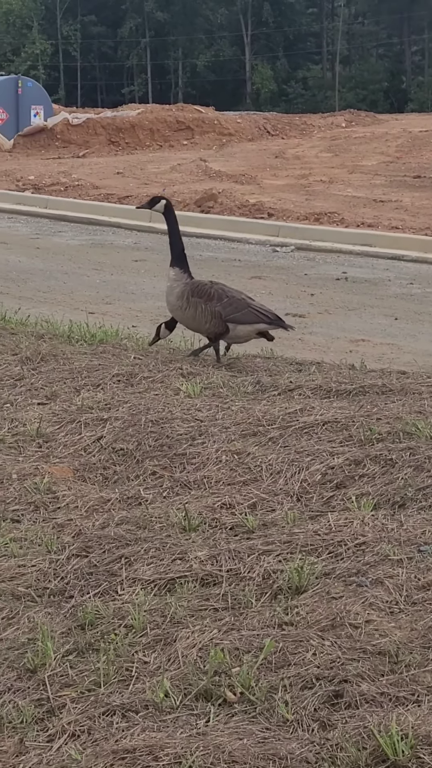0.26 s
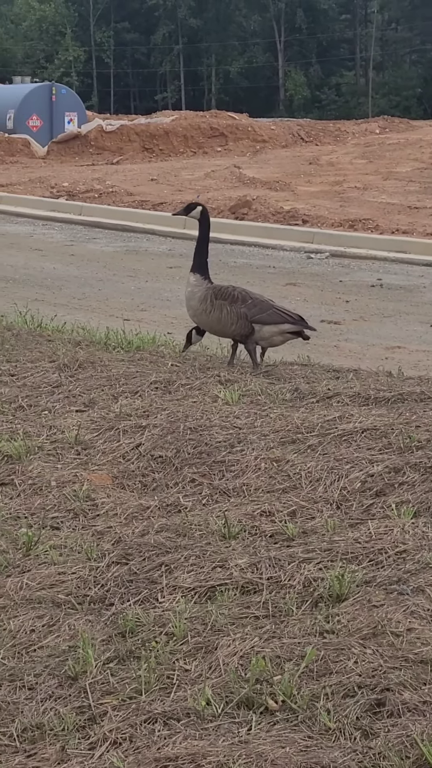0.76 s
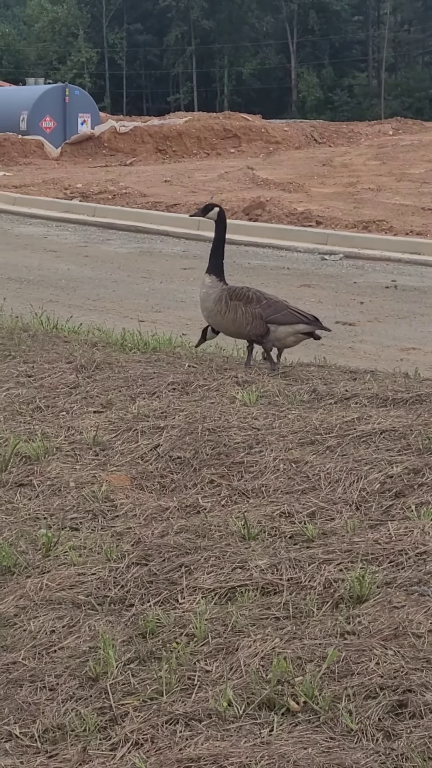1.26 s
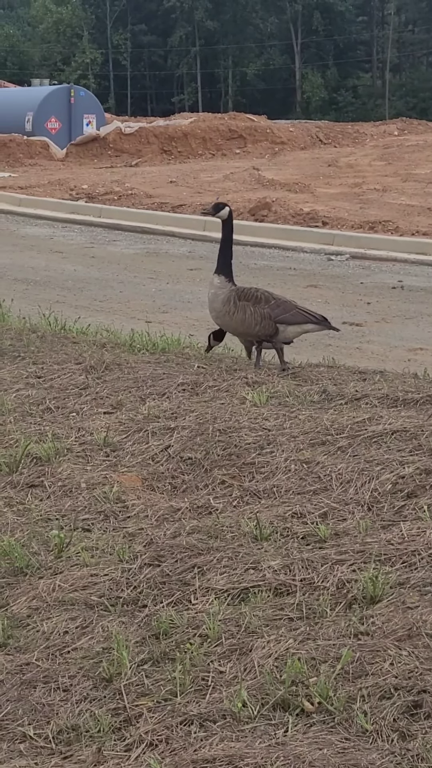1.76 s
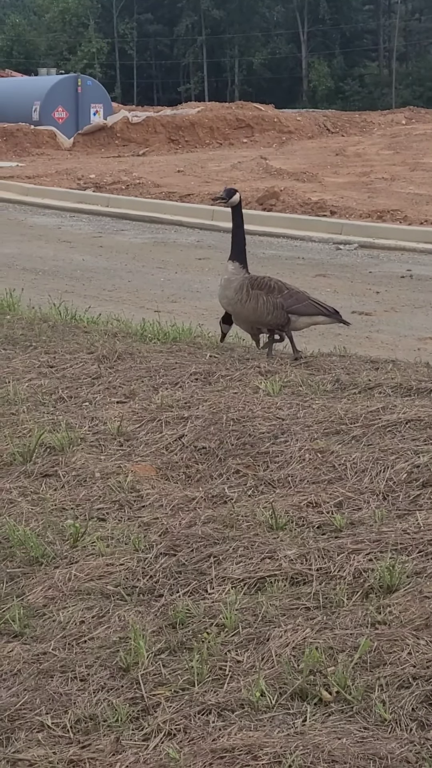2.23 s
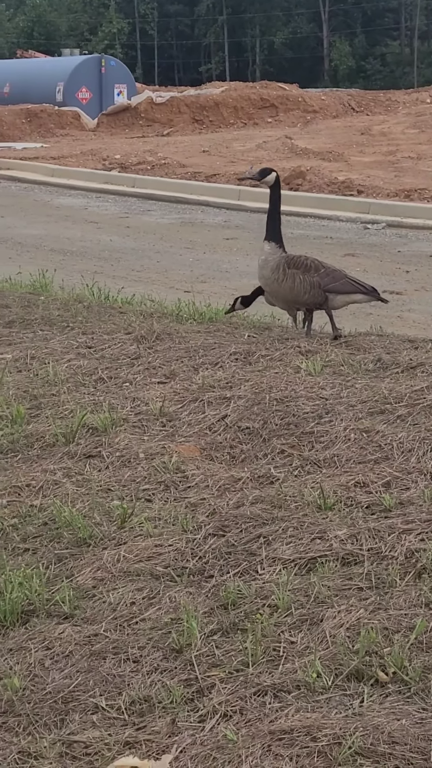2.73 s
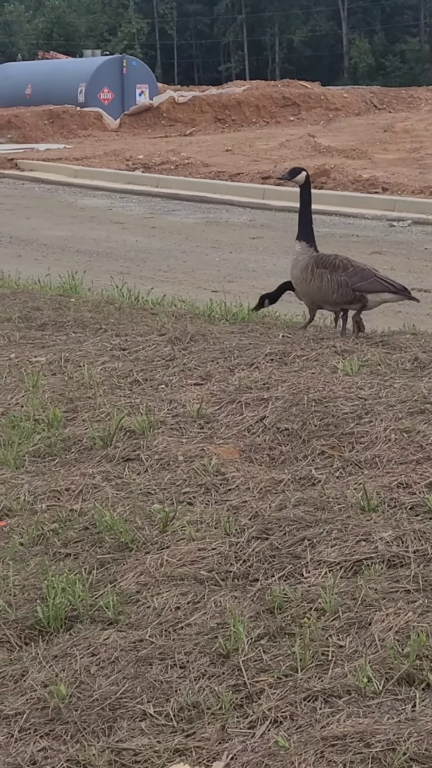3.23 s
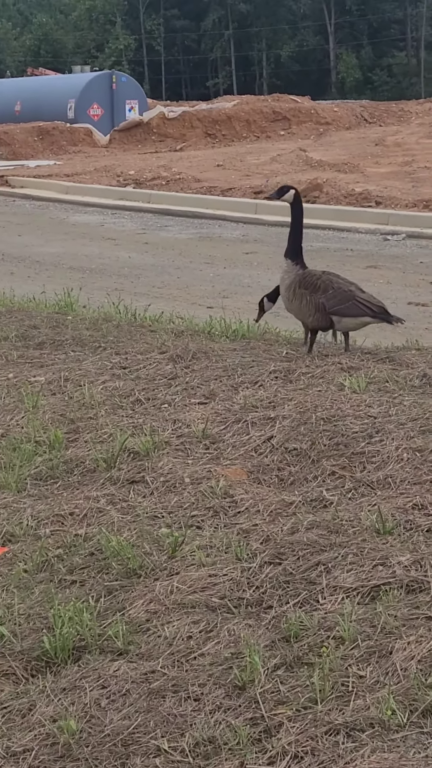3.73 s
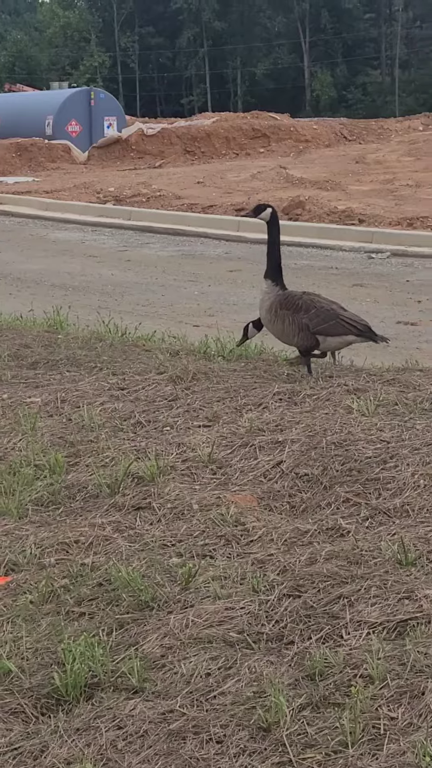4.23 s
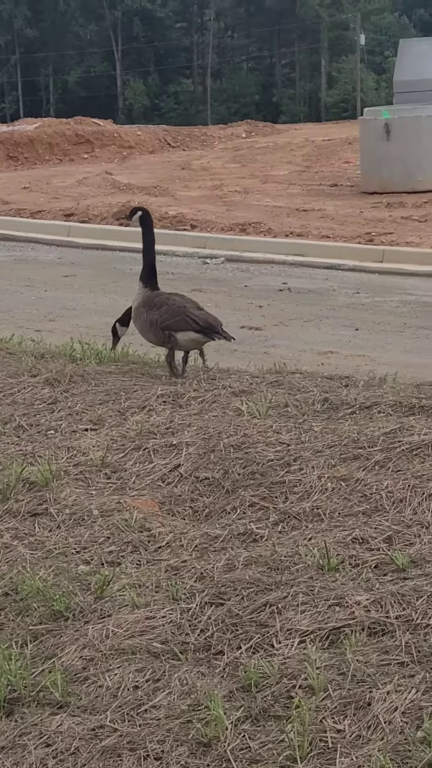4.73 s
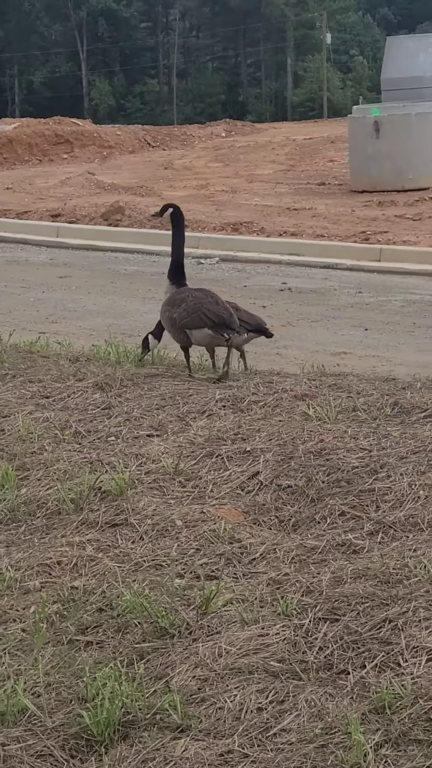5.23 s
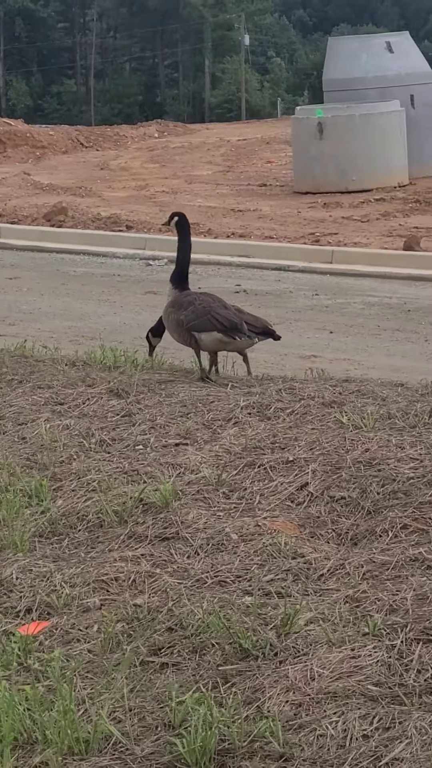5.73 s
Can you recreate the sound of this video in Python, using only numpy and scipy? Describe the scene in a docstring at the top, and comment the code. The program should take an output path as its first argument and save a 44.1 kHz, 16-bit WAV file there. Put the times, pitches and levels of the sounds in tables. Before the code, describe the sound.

A goose gives one short, raspy honk nearby over a steady low rumble of distant traffic, then dry grass crackles faintly.

```python
"""Distant traffic rumbles and engines drone, heard from dry grass beside a building site.
Faint slurred whistles come and go in a thin hiss. Near the microphone a goose gives one short honk:
its flapping membrane makes a rattling growl that swells and breaks into a clear note.
Dry straw then crackles underfoot. Throughout, a hand half covers the right microphone port,
muffling it, rubbing it and bumping it now and then."""
import sys
import numpy as np
from scipy import signal
from scipy.fft import rfft, irfft
from scipy.io import wavfile
from scipy.ndimage import uniform_filter1d

SR = 44100
rng = np.random.default_rng(int(sys.argv[2]) if len(sys.argv) > 2 else 0)


def wav_out(sig):
    """Save sig, one row per channel (or a flat mono array), as 16-bit PCM at SR to the path in sys.argv[1]."""
    wavfile.write(sys.argv[1], SR, np.round(np.clip(np.atleast_2d(sig).T, -1, 1) * 32767).astype(np.int16))


N = 264159
TIME = np.arange(N) / SR
BINS = np.fft.rfftfreq(N, 1 / SR)
# the honk: the growl starts, breaks into the note, and is released
GROWL_S, BREAK_S, RELEASE_S = 2.228, 2.3845, 2.438
CHAOS_S = .013  # the flapping is most chaotic this long before the break

# likeness of diffuse sound at the two ports: (frequency [Hz], correlation [0-1])
PORT_LIKENESS = [(25, 0), (60, 0.004), (130, 1), (290, 0.67), (640, 1), (1400, 0.38), (3000, 0), (15000, 0)]
# low rumble of distant traffic: (frequency [Hz], relative level [dB])
RUMBLE_SPECTRUM = [(11, -49), (18, -10), (49, 2), (129, 0.5), (206, -5.5), (239, -8.5), (270, -10),
                   (450, -22.5), (580, -70), (990, -120)]
# roar of far tyres: (frequency [Hz], relative level [dB])
TYRE_SPECTRUM = [(240, -10.5), (400, -19), (480, -6), (643, 0.5), (800, -3), (1170, -7.5), (1850, -20.5),
                 (3160, -28.5), (4040, -40), (5410, -34.5), (6400, -50.5), (7600, -44.5), (8400, -48.5),
                 (9400, -39), (11200, -49), (15600, -51)]
# far engines: (starting pitch [Hz], glide [Hz/s], base level [dB], swells),
# each swell (time [s], half-width [s], height [dB])
ENGINE_DRONES = [(231, 2.5, -40, [(2.0, 0.83, 8.5), (3.4, 0.34, 5), (5.6, 0.67, 3.5)]),
                 (101.2, 0.27, -39.5, [(2.0, 0.46, 5.5), (3.45, .25, 6), (4.75, .3, 6)]),
                 (125.3, 1.0, -45, [(3.3, 0.46, 16), (4.65, 0.62, 16.5), (5.9, .25, 15.5)]),
                 (78.8, -0.9, -41.5, [(0.72, .45, 8.5)])]
# thin background hiss: (frequency [Hz], relative level [dB])
HISS_SPECTRUM = [(1500, -4), (2500, -8), (3600, 0.5), (4100, -3), (4900, -3), (5600, -6), (6300, -28),
                 (7500, -17), (8500, -26), (15000, -24)]
# faint rings in the hiss: (frequency [Hz], width [Hz], level against the hiss [dB])
HISS_RESONANCES = [(3576, 81, -10), (4935, 210, -13.5), (5520, 150, -15)]
# swells and dips of the hiss: (time [s], half-width [s], change [dB])
HISS_CHANGES = [(.6, 0.23, 3.5), (3.536, 0.2, -7), (5.85, 0.17, -5)]
# faint whistles: (start [s], length [s], first pitch [Hz], last pitch [Hz], width [Hz], level [dB])
WHISTLE_GLIDES = [(.44, .16, 5500, 4850, 450, -70), (.69, .12, 5680, 5150, 200, -68),
                  (0.888, .13, 3040, 3130, 55, -61), (1.0, .13, 3000, 3620, 55, -59.5),
                  (1.09, .09, 4600, 4800, 450, -59), (1.15, .21, 3300, 3130, 55, -60.5),
                  (1.34, .11, 3190, 3370, 70, -62.5), (1.508, .12, 2970, 3320, 90, -62),
                  (3.788, 0.12, 4560, 5750, 350, -60), (3.89, .09, 4800, 4970, 400, -57),
                  (3.91, .045, 11300, 11700, 400, -63), (3.95, 0.098, 10800, 9900, 900, -67),
                  (4.0, .14, 6060, 5750, 200, -66), (4.09, .22, 9900, 9450, 900, -68),
                  (4.26, 0.11, 5860, 5450, 250, -62.5), (4.34, 0.088, 5450, 4300, 400, -57),
                  (4.395, 0.081, 4400, 5700, 400, -58.5), (4.452, .08, 9600, 10000, 700, -67),
                  (4.48, .11, 5930, 5550, 250, -63.5)]
# crushed dry straw: (frequency [Hz], relative level [dB])
STRAW_SPECTRUM = [(500, -32), (1000, -3), (1600, -4), (3060, -3.5), (4000, -9.5), (5200, -6), (6100, -16),
                  (7700, -17.5), (8500, -17), (12000, -20), (15600, -19)]
# steps on the straw: (start [s], length [s], relative level [dB], treble cutoff [Hz])
FOOTSTEPS = [(2.45, 1, -53, 8000), (3.627, 0.078, -48, 11000), (3.773, 0.015, -41.5, 11500),
             (3.75, 0.26, -56, 14000), (3.857, 0.16, -50.5, 8000), (4.137, 0.049, -50, 8000),
             (4.568, 0.19, -42.5, 3680), (5.268, 0.18, -39, 13900), (5.391, 0.049, -40, 6000),
             (5.53, 0.41, -56.5, 14000), (5.933, 0.16, -44.5, 7000)]
# single stalks snapping: (time [s], relative peak [dB], ring [Hz])
STALK_SNAPS = [(2.6226, -32, 2520), (2.849, -38, 2600), (3.716, -36, 3400), (3.7957, -38, 3280),
               (3.8625, -34.5, 3800), (3.892, -38, 2320), (4.0063, -40, 3401), (5.2943, -37.5, 2620),
               (5.318, -35, 3210), (5.326, -41, 3130), (5.494, -33, 3200)]
# dulling of snaps and crackle: (frequency [Hz], gain [dB])
STALK_DULLING = [(1000, 0.5), (4500, -1.5), (6500, -12), (15000, -12)]
# muffling of the right port under the hand: (frequency [Hz], loss [dB])
PORT_LOSS = [(25, 34), (60, 12.4), (130, 18.2), (250, 18.4), (420, 18.7), (600, 29), (1170, 13.8),
             (1800, 19.7), (4200, 23.2), (6400, 40), (8100, 24), (8500, 31), (9300, 1), (10600, 28),
             (15000, 3.8)]
# the hand sliding over that port: (time [s], half-width [s], level [dB])
HAND_RUBS = [(0.8, 0.45, -45), (3.7, 0.25, -40), (5.25, 0.11, -33.5)]
# the hand bumping that port: (time [s], level [dB], pitch [Hz], case knock against the push [dB])
HAND_BUMPS = [(0.414, -27.5, 71, -30), (0.6, -25, 75, -35), (0.782, -36, 80, -28), (0.913, -28, 80, -28),
              (1.05, -26, 45, -35), (1.133, -27, 70.6, -28), (2.115, -28, 100, -30), (2.145, -28, 65, -35),
              (3.487, -28, 150, -9), (3.56, -23, 70, -17), (3.605, -24, 60.3, -30), (3.79, -24, 79, -28),
              (3.84, -18, 65, -32), (4.014, -25, 90, -24), (4.046, -28, 45, -35), (4.124, -16, 62, -32),
              (5.125, -27, 95, -20), (5.25, -14.5, 100, -11), (5.279, -16.5, 84.6, -16),
              (5.338, -28, 90, -18), (5.367, -22, 111, -17)]
# decay of the outdoor scatter: (frequency [Hz], time to fall 60 dB [s])
SCATTER_DECAY = [(300, .5), (1200, 0.46), (4000, 0.39), (12000, 0.17)]
# the goose's throat resonances: (frequency [Hz], width [Hz], relative gain [dB])
THROAT_RESONANCES = [(498, 130, -7.5), (1107, 114, 0), (1300, 66, -0.5), (1356, 114, -0.5), (1537, 95, -11),
                     (1950, 98, -18), (3400, 700, -40)]
# harmonics of its clear note: (multiple of the pitch, relative level [dB])
NOTE_PARTIALS = [(1, -11), (2, 4.5), (3, -21.5), (4, -41), (5, -48), (6, -38)]
# rasp of air at each flap: (frequency [Hz], relative gain [dB])
RASP_SPECTRUM = [(300, -34), (1500, 12.5), (2000, -10), (2500, -6), (2950, -8), (3380, 8.5), (3800, 1),
                 (4200, -10), (4900, -2), (6500, -9), (7150, -18), (8000, -18), (10500, -11), (11500, -21),
                 (15500, -31)]


def gain_of(db):
    """Decibels to amplitude."""
    return 10 ** (np.asarray(db) / 20)


def unit_rms(x):
    """Scales to an rms of one."""
    return x / np.sqrt(np.mean(x ** 2) + 1e-20)


def lookup(table, hz):
    """Reads a table on a log-frequency axis."""
    table_hz, values = np.transpose(table)
    return np.interp(np.log(hz + 1), np.log(table_hz + 1), values)


def colour(x, spectrum):
    """Filters by a spectrum table."""
    return irfft(rfft(x) * gain_of(lookup(spectrum, BINS)), N)


def drift(rate_hz, size=8192):
    """Slow random wander of rms one."""
    t = np.linspace(0, N / SR, size)
    rolloff = 1 + (np.fft.rfftfreq(size, t[1]) / rate_hz) ** 4
    slow = irfft(rfft(rng.standard_normal(size)) / rolloff, size)
    return np.interp(TIME, t, unit_rms(slow))


def resonate(x, hz, width_hz):
    """Two like resonances in series, centred on hz, which may glide."""
    carrier = np.exp(2j * np.pi * np.cumsum(hz * np.ones(len(x))) / SR)
    pole = np.exp(-np.pi * width_hz / SR)
    for _ in range(2):
        x = 2 * (carrier * signal.lfilter([1 - pole], [1, -pole], x / carrier + 1e-18)).real
    return x


def add(mix, s, sound):
    """Mixes a sound in at time s."""
    part = mix[round(s * SR):][:len(sound)]
    part += sound[:len(part)]


def since(s):
    """Seconds gone since time s; zero before it."""
    return np.maximum(TIME - s, 0)


def until(s):
    """Seconds left until time s; zero after it."""
    return np.maximum(s - TIME, 0)


def ramp(s, length):
    """Rises from zero to one, starting at time s."""
    return np.minimum(since(s) / length, 1)


def hump(s, half_width):
    """A bell of height one around time s."""
    return np.exp(-((TIME - s) / half_width) ** 2)


def pulses(cycles, count):
    """One sharp pulse a cycle, with about count / 2 harmonics."""
    return unit_rms(np.sinc(count * ((cycles + .5) % 1 - .5)) - 1 / count)


def patchy(x, depth_db):
    """Lets patches of a noise, some 40 ms by 300 Hz, swell and dip on their own."""
    frames = signal.stft(x, nperseg=512)[2]
    patches = uniform_filter1d(rng.standard_normal(frames.shape[-2:]), size=4, axis=0)
    patches = uniform_filter1d(patches, size=7, axis=1)
    return signal.istft(frames * gain_of(depth_db * unit_rms(patches)), nperseg=512)[1][..., :N]


def diffuse(spectrum):
    """Noise from all around the microphone; its treble is unrelated at the two ports."""
    left, unrelated = rfft(rng.standard_normal((2, N)))
    likeness = lookup(PORT_LIKENESS, BINS)
    right = likeness * left + np.sqrt(1 - likeness ** 2) * unrelated
    return unit_rms(irfft(np.array([left, right]) * gain_of(lookup(spectrum, BINS)), N))


def traffic(rumble_db=-25, tyre_db=-36):
    """Distant traffic: a low rumble and the roar of tyres, each swelling a little."""
    rumble = diffuse(RUMBLE_SPECTRUM) * gain_of(rumble_db + .6 * drift(1.5))
    tyres = diffuse(TYRE_SPECTRUM) * gain_of(tyre_db + .45 * drift(1.8))
    return rumble + tyres


def exhaust(top_s=1.6, swell_db=-31.5, rise_db_per_s=6, fall_db_per_s=22, murmur_db=-43):
    """The booming exhaust of a far vehicle builds slowly, then falls away to a murmur."""
    boom = unit_rms(resonate(rng.standard_normal(N), hz=176, width_hz=65))
    swell = gain_of(swell_db - rise_db_per_s * until(top_s) - fall_db_per_s * since(top_s))
    return (swell + gain_of(murmur_db)) * boom


def engine(start_hz, glide, db, swells, waver=.0038, wander_hz=.631, fading_db=.9):
    """A far engine's tone glides and swells, wavering and fading on its way through the air."""
    hz = start_hz + glide * TIME + wander_hz * drift(.78)
    cycles = np.cumsum(hz * (1 + waver * drift(7.6))) / SR
    swell_db = sum(height * hump(s, half_width) for s, half_width, height in swells)
    return gain_of(db + swell_db + fading_db * drift(1.22)) * unit_rms(np.sin(2 * np.pi * cycles))


def hiss(early_db=-69, late_db=-55, opens_s=2.12, flicker_db=1.5):
    """A thin, uneven hiss all around, with faint rings in it; it opens up just before the honk."""
    noise = rng.standard_normal(N)
    rings = sum(gain_of(db) * unit_rms(resonate(noise, hz, width)) for hz, width, db in HISS_RESONANCES)
    bed = patchy(diffuse(HISS_SPECTRUM), depth_db=2.5)
    level_db = early_db + (late_db - early_db) * ramp(opens_s, .057)
    level_db += sum(db * hump(s, half_width) for s, half_width, db in HISS_CHANGES)
    return (bed + rings) * gain_of(level_db + flicker_db * drift(22))


def whistles():
    """Faint, fuzzy whistles in the background, each gliding in pitch as it swells and fades."""
    out = np.zeros(N)
    for s, length, first_hz, last_hz, width, db in WHISTLE_GLIDES:
        progress = np.linspace(0, 1, round(length * SR))
        hz = first_hz + (last_hz - first_hz) * progress
        tone = unit_rms(resonate(rng.standard_normal(len(hz)), hz, width))
        arch = np.sqrt(4 * progress * (1 - progress))
        add(out, s, gain_of(db) * arch * tone)
    return out


def straw_steps(stalks_per_s=11000, spread_db=2.4, attack_share=.16):
    """Each step crushes many small stalks of uneven size underfoot."""
    sizes = gain_of(spread_db * np.minimum(rng.exponential(1, N), 4))
    grains = rng.standard_normal(N) * sizes * (rng.random(N) < stalks_per_s / SR)
    crunch = unit_rms(colour(grains, STRAW_SPECTRUM))
    out = np.zeros(N)
    for s, length, db, cutoff_hz in FOOTSTEPS:
        progress = since(s) / length
        weight = gain_of(db) * np.minimum(progress / attack_share, 1) * np.exp(-2 * progress ** 2)
        out += weight * signal.lfilter(*signal.butter(2, cutoff_hz, fs=SR), crunch)
    return out


def straw_snaps(boost_db=5, crack_s=.0013):
    """A few larger stalks snap on their own, each with a brief ring."""
    out, t = np.zeros(N), np.arange(1024) / SR
    for s, db, hz in STALK_SNAPS:
        crack = rng.standard_normal(len(t)) * t / crack_s * np.exp(-t / crack_s)
        ring = resonate(crack, hz, width_hz=2000)
        add(out, s, gain_of(db + boost_db) * ring / abs(ring).max())
    return colour(out, STALK_DULLING)


def straw_crackle(start_s=2.5, stalks_per_s=60, db=-64.5, clump_db=4, decay_s=.002):
    """Bent stalks on the ground give way in small irregular clumps."""
    clicks = (rng.random(N) < stalks_per_s / SR) * rng.random(N) * gain_of(clump_db * drift(10))
    envelope = signal.lfilter([1], [1, -np.exp(-1 / (decay_s * SR))], clicks)
    bursts = colour(envelope * rng.standard_normal(N), STRAW_SPECTRUM)
    return gain_of(db) * (TIME > start_s) * unit_rms(colour(bursts, STALK_DULLING))


def covered_port(x, lag_s=.00014):
    """Under the hand, the right port picks everything up muffled and a little late."""
    muffled = colour(x, [(hz, -loss_db) for hz, loss_db in PORT_LOSS])
    return np.interp(TIME - lag_s, TIME, muffled)


def wind_and_rubbing(lump_db=3, wind_db=-49):
    """A low, lumpy rumble of wind at the right port never quite stops; the hand sliding on the microphone
    swells it."""
    rumble = resonate(rng.standard_normal(N), hz=45, width_hz=90) * gain_of(lump_db * drift(13))
    slides = sum(gain_of(db) * hump(s, half_width) for s, half_width, db in HAND_RUBS)
    return unit_rms(rumble) * (gain_of(wind_db) + slides)


def hand_bumps(attack_cycles=.14):
    """Each shift of the hand is a dull push of air at the port, with a faint knock of the case."""
    out, t = np.zeros(N), np.arange(4096) / SR
    for s, db, hz, knock_db in HAND_BUMPS:
        cycles = hz * t
        envelope = np.minimum(cycles / attack_cycles, 1) * np.exp(-cycles ** 2 / 2)
        push = envelope * np.sin(2 * np.pi * cycles)
        knock = resonate(rng.standard_normal(len(t)) * np.exp(-cycles), hz=380, width_hz=200)
        add(out, s, gain_of(db) * (push + gain_of(knock_db) * knock / abs(knock).max()))
    return out


def scatter(x, echoes_per_s=2000, first_echo_s=.012):
    """Earth banks and trees scatter sound back to both ports; the treble dies first."""
    t = np.arange(SR) / SR
    taps = rng.standard_normal((2, SR)) * (rng.random((2, SR)) < echoes_per_s / SR) * (t > first_echo_s)
    hz, age_s, frames = signal.stft(taps, SR, nperseg=256)
    decay = gain_of(-60 * age_s / lookup(SCATTER_DECAY, hz)[:, None])
    tail = signal.istft(frames * decay, SR, nperseg=256)[1]
    return signal.fftconvolve(x[None], tail / np.linalg.norm(tail[0]), axes=1)[:, :N]


def membrane_cycles(growl_hz=142, locked_hz=150.8, jump_hz=15, scoop_hz=11, shift_s=.006,
                    rise_hz_per_s=32, sag_hz_per_s=105, droop_hz_per_s=430):
    """Flaps of the goose's membrane, counted from the break: the rate scoops up, jumps, then sags."""
    hz = growl_hz - rise_hz_per_s * until(BREAK_S) - scoop_hz * np.exp(-since(GROWL_S) / .016)
    hz += (locked_hz - hz) * ramp(BREAK_S - 2 * shift_s, shift_s)
    hz += jump_hz * hump(BREAK_S, .009)
    # the rate sags as the air runs out, and faster after the release
    hz -= sag_hz_per_s * np.minimum(since(BREAK_S), RELEASE_S - BREAK_S)
    hz -= droop_hz_per_s * np.minimum(since(RELEASE_S), .022)
    jitter = np.where(TIME < BREAK_S, .005, .0025) + .017 * hump(BREAK_S - CHAOS_S, CHAOS_S)
    cycles = np.cumsum(hz * (1 + jitter * drift(120))) / SR
    return cycles - np.interp(BREAK_S, TIME, cycles)


def honk_envelopes(release_db_per_s=715, buzz_top_s=2.409):
    """Gains of growl, note and buzz: each swells, sags and shares the same release."""
    call = ramp(GROWL_S, .048) * gain_of(-release_db_per_s * since(RELEASE_S))
    breaking = hump(BREAK_S, .011)
    # slopes in dB per second; growl and buzz get a brief lift at the break
    growl = gain_of(-20 - 125 * until(BREAK_S) - 200 * since(BREAK_S) + 5.5 * breaking)
    note = ramp(BREAK_S, .014) ** 2 * gain_of(-8 - 45 * since(BREAK_S))
    buzz = gain_of(-29.5 - 308 * until(buzz_top_s) - 100 * since(buzz_top_s) + 3 * breaking)
    return call * growl, call * note, call * buzz


def goose(throb=.1, sway_rad=.1, leak=.37, puff_cycles=.25, air_share=.48, shimmer_db=.6):
    """Nearby, a goose's membrane flaps into its throat, then locks into a note at four times the rate."""
    cycles = membrane_cycles()
    flap_phase = 2 * np.pi * cycles
    # air escapes in one puff a flap
    opening = leak + np.exp(-(cycles % 1) / puff_cycles)
    puffs = unit_rms(opening * rng.standard_normal(N))
    # the flapping turns chaotic just before it locks
    roughness = .44 + .28 * hump(BREAK_S - CHAOS_S, 2 * CHAOS_S)
    drive = np.sqrt(1 - roughness ** 2) * pulses(cycles, count=150) + roughness * puffs
    growl = unit_rms(sum(gain_of(db) * resonate(drive, hz, width) for hz, width, db in THROAT_RESONANCES))
    # each flap pulls on the note's pitch and loudness, putting sidebands beside its harmonics
    note_phase = 4 * flap_phase - sway_rad * np.sin(flap_phase)
    harmonics = sum(gain_of(db) * np.sin(multiple * note_phase) for multiple, db in NOTE_PARTIALS)
    shimmer = gain_of(shimmer_db * drift(150))
    note = unit_rms(harmonics * shimmer * (1 + throb * np.cos(flap_phase)))
    # the bright buzz is part air, part reedy snap of the note, strongest as each flap opens
    reed = unit_rms(opening * pulses(note_phase / (2 * np.pi) - .5, count=54))
    buzz = unit_rms(colour(air_share * puffs + (1 - air_share) * reed, RASP_SPECTRUM))
    growl_gain, note_gain, buzz_gain = honk_envelopes()
    return growl_gain * growl + note_gain * note + buzz_gain * buzz


def scene(scatter_db=-28):
    """Far road, straw underfoot and goose at the microphone: left port open, right half covered."""
    honk = goose()
    road = traffic() + exhaust() + sum(engine(*row) for row in ENGINE_DRONES)
    background = road + whistles()
    echo = gain_of(scatter_db) * scatter(honk)
    straw = straw_steps() + straw_snaps() + straw_crackle()
    left, right = background + hiss() + straw + echo + honk
    return np.array([left, covered_port(right) + hand_bumps() + wind_and_rubbing()])


def record(dry, cutoff_hz=15740):
    """The recorder's band limit."""
    lowpass = signal.firwin(1023, cutoff_hz, window=("kaiser", 9), fs=SR)
    return signal.oaconvolve(dry, lowpass[None], "same")


dry = scene()
out = record(dry)
wav_out(out)
```